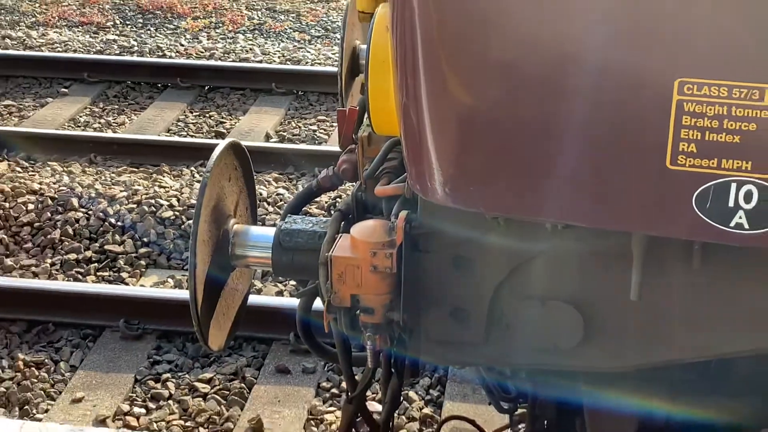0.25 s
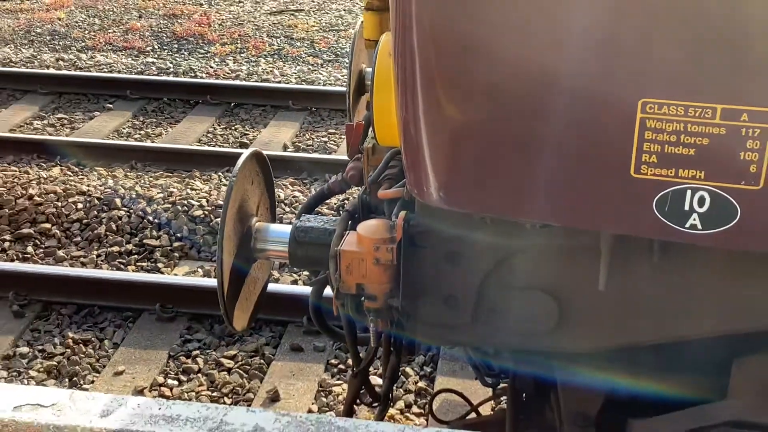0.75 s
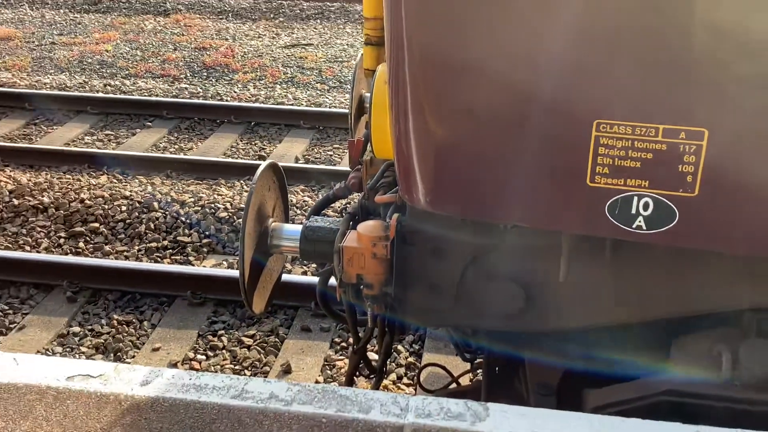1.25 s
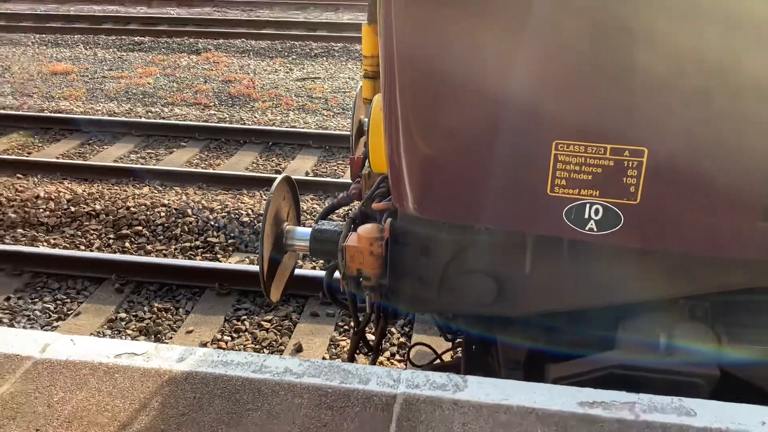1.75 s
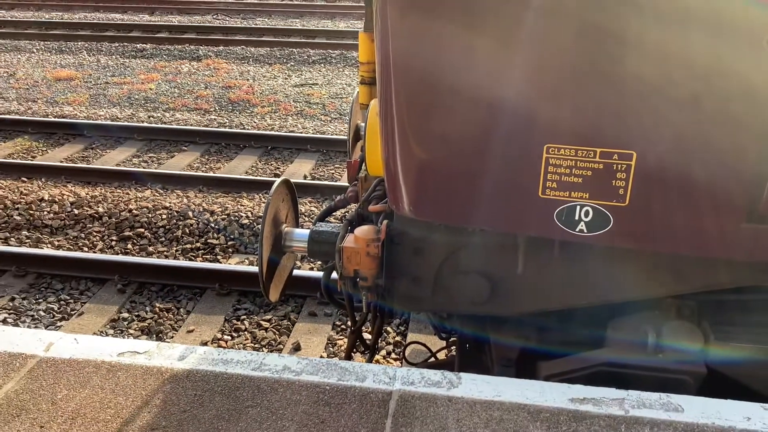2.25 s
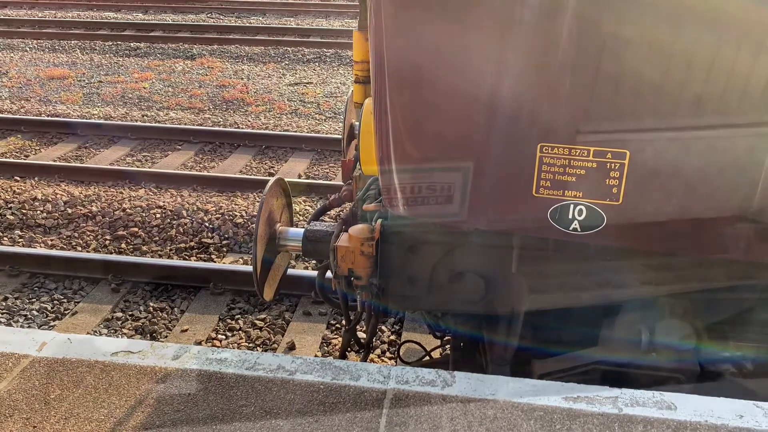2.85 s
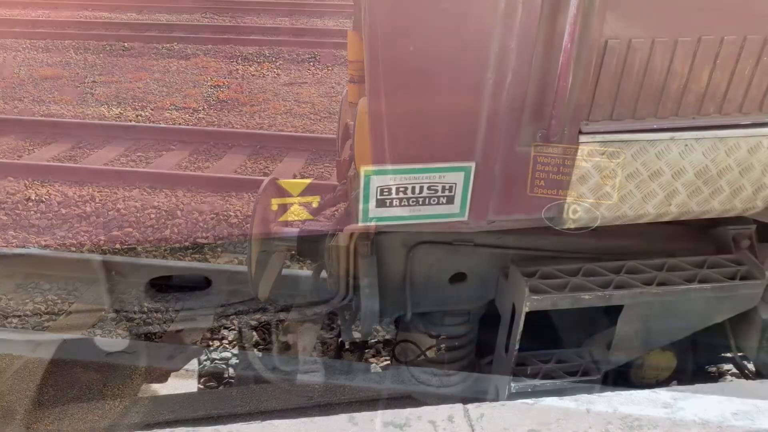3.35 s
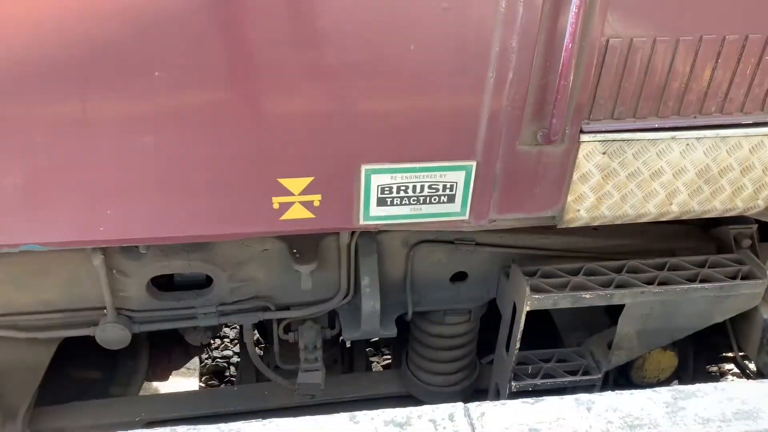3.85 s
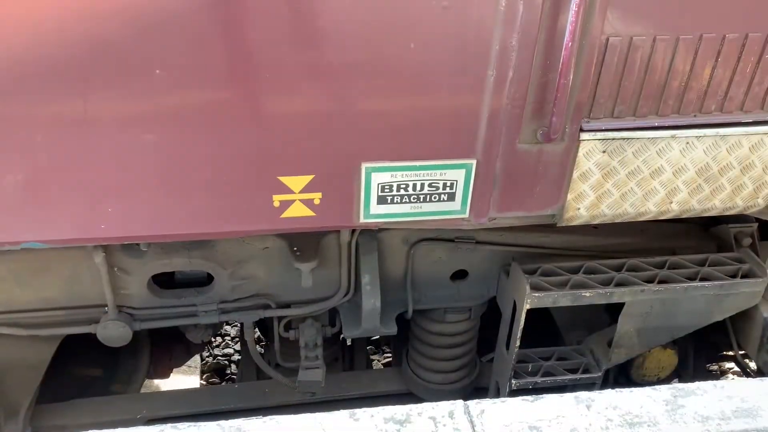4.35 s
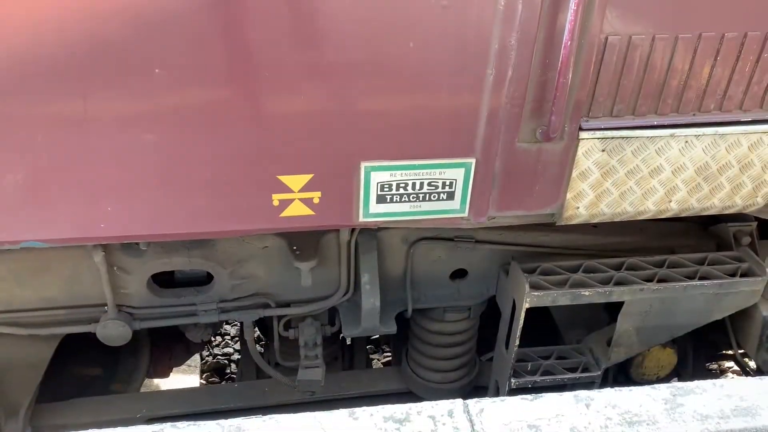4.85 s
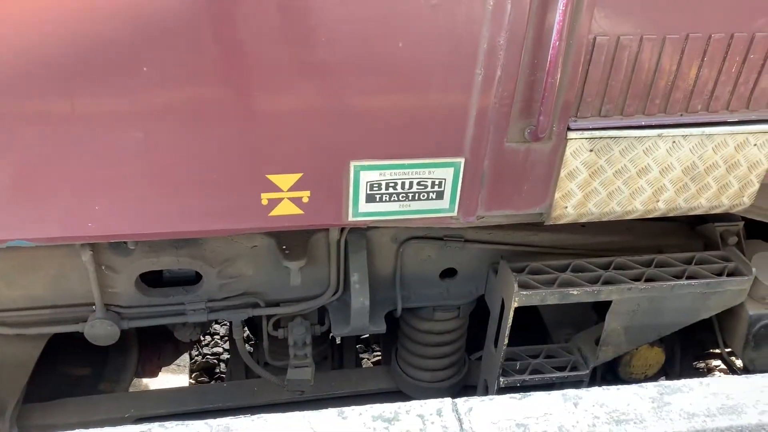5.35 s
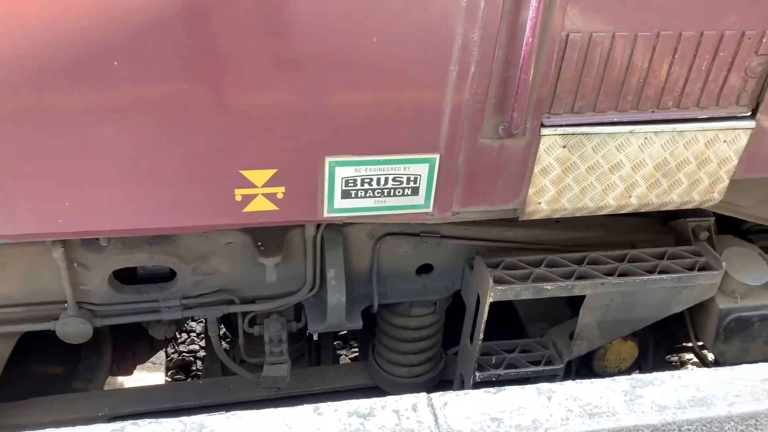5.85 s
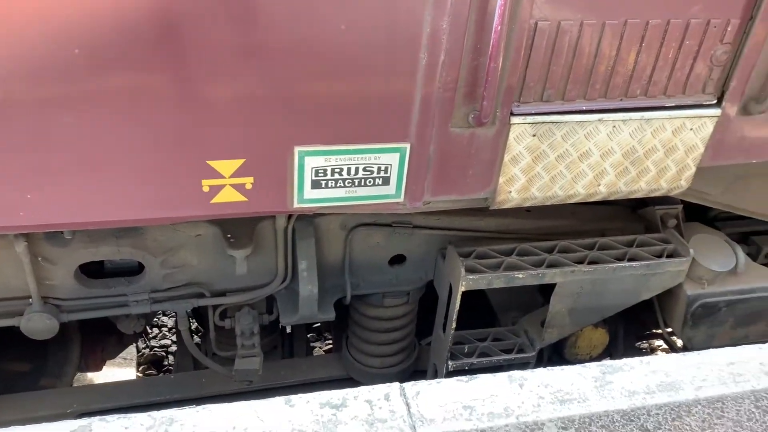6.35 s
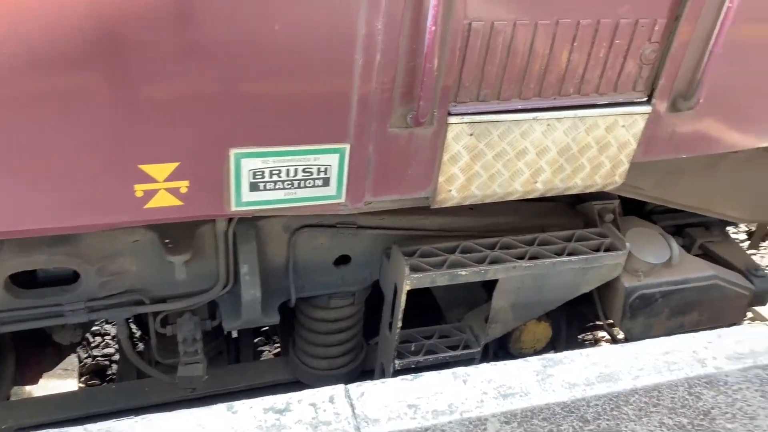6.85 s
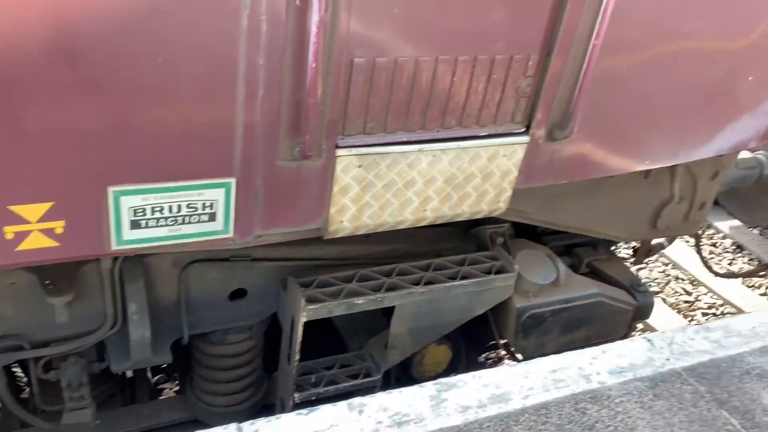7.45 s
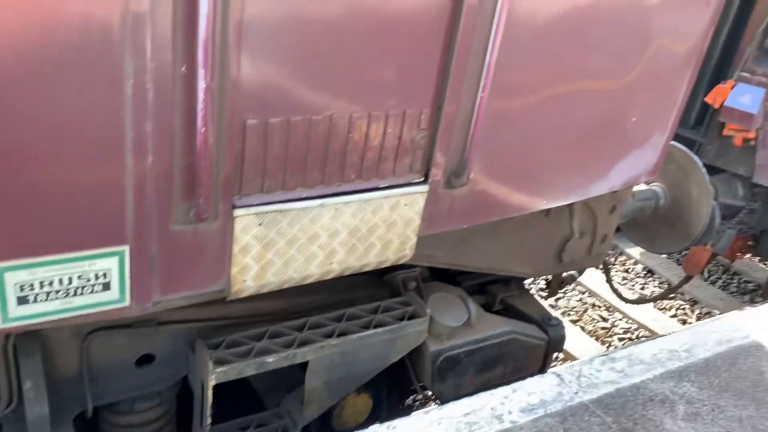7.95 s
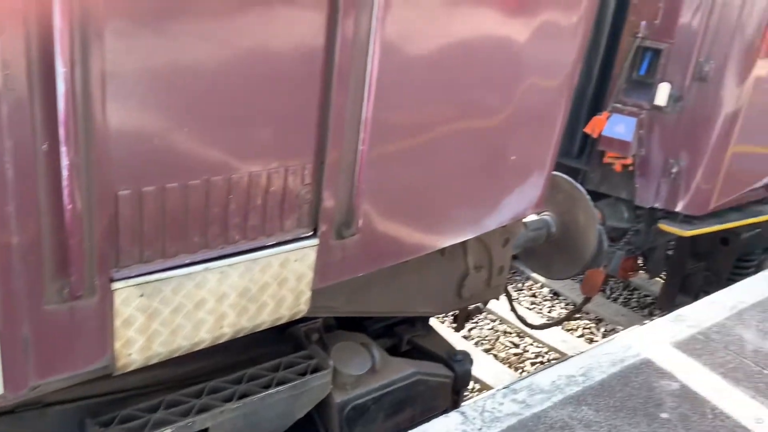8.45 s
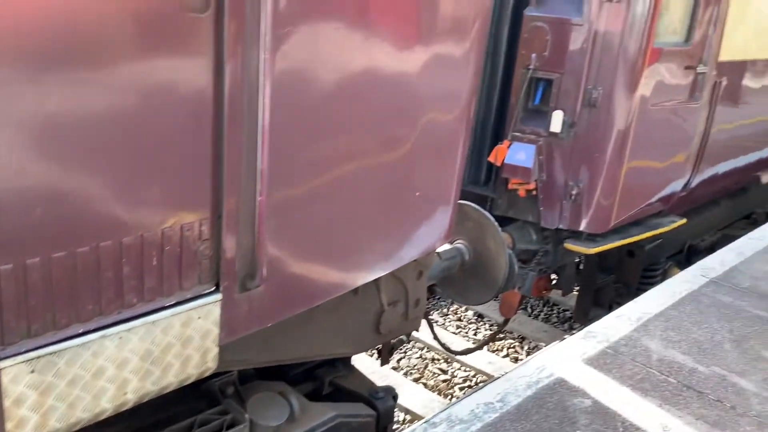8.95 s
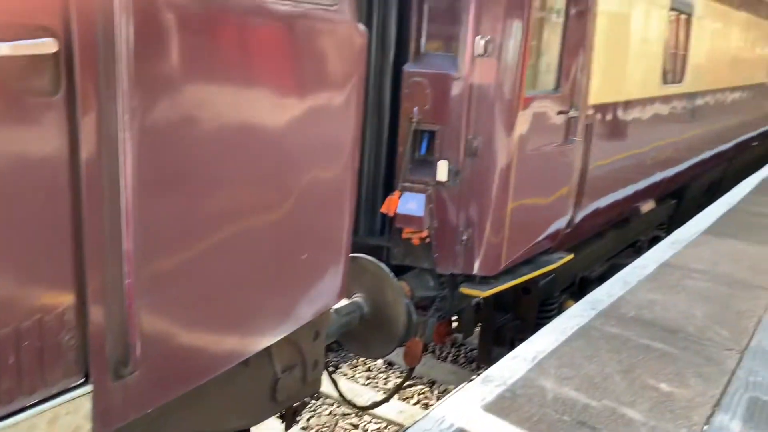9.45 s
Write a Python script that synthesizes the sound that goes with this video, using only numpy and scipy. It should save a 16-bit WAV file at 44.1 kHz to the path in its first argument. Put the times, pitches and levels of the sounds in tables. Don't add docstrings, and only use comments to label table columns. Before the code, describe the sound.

A heavy diesel locomotive idles close by with a deep throbbing drone and whine, then a quieter spot where an air valve ticks steadily.

```python
import sys
import numpy as np
from scipy import signal
from scipy.fft import rfft, irfft, next_fast_len
from scipy.io import wavfile
from scipy.ndimage import uniform_filter1d, map_coordinates

SR = 44100
rng = np.random.default_rng(int(sys.argv[2]) if len(sys.argv) > 2 else 0)


def log_audio(samples):
    frames = np.atleast_2d(samples).T
    limited = np.clip(frames, -1, 1)
    pcm = np.round(limited * 32767).astype(np.int16)
    wavfile.write(sys.argv[1], SR, pcm)


def ratio_of_db(decibels):
    return 10 ** (np.asarray(decibels, float) / 20)


N = 427329

CRANK_HZ, MESH_HZ = 6.815, 269.1
FADE_S = (2.67, 3.635)
NEAR_WALK_S, FAR_WALK_S = (0, 2.41), (7.98, 9.6)
GAP_HZ = (11250, 12250)


def unit(x):
    return x / np.sqrt(np.mean(x ** 2) + 1e-20)


def along(points, hz):
    f, *cols = np.transpose(points)
    return [np.interp(np.log(hz + 1), np.log(f + 1), c) for c in cols]


def curves(rows):
    s, *cols = np.transpose(rows)
    return [np.interp(np.arange(N) / SR, s, c) for c in cols]


def ramp(span_s):
    return np.interp(np.arange(N) / SR, span_s, [0, 1])


def wobble(rate):
    knots = rng.standard_normal(int(N * rate / SR) + 4)
    return map_coordinates(knots, [np.arange(N) * rate / SR])


# (frequency [Hz], likeness [0-1], right leads [rad], left against right [dB])
NEAR_PAIR = [(60, .99, .25, -1.3), (110, .99, .4, -.9), (160, .98, .6, -.2), (350, .95, 1.1, .4),
             (570, .8, 2.3, 0), (900, .68, 2.8, -4.7), (1100, .55, 2.3, -5.8), (1500, .65, 2.4, -1.5),
             (2200, .4, 2.2, -1.4), (4500, .2, 2.5, -3.3), (7000, .5, 1, -.5), (10000, .85, 0, 0)]
FAR_PAIR = [(55, .99, .05, -2.5), (62, .99, -.15, -1.4), (70, .99, -.1, -1.8), (160, .98, .1, -.1),
            (350, .92, -.2, -.3), (570, .72, -.6, -1.2), (900, .76, -1.5, -.3), (1500, .48, -2.9, -1.6),
            (2200, .1, -3, -1.1), (4500, .25, -2, -3), (7000, .5, -1.5, -.5), (10000, .85, 0, 0)]


def ears(pair, hz):
    alike, lead, pan_db = along(pair, hz)
    alike = np.clip(alike, 0, 1)
    side = np.array([[-.5], [.5]])
    gains = np.exp(1j * lead * side) * ratio_of_db(-pan_db * side)
    return alike, gains / np.sqrt((1 + alike * np.cos(lead)) / 2)


def burst(spectrum, t, skew):
    hz = np.fft.rfftfreq(len(t), 1 / SR)
    kept = np.where((hz > GAP_HZ[0]) & (hz < GAP_HZ[1]), .03, 1)
    colour = kept * ratio_of_db(along(spectrum, hz)[0]) * np.exp(1j * skew * np.array([[.5], [-.5]]))
    return unit(irfft(rfft(rng.standard_normal(len(t))) * colour, len(t)))


def puff(t, spectrum):
    shape = np.exp(-((t - .0025) / 0.0018) ** 2)
    shape += 0.22 * np.exp(-((t - .01) / 0.0033) ** 2)
    shape += 0.33 * (1 - np.exp(-t / 0.0022)) * ratio_of_db(-60 * t / 0.22)
    return burst(spectrum, t, skew=1.6) * shape


TURN_S = 6.8

# (frequency [Hz], level [dB per Hz])
SNAP = [(600, -38), (1000, -9), (1400, 9), (1700, -13), (2600, 0), (3100, -3.5), (4200, -7), (5000, -24),
        (8000, -56)]
# (frequency [Hz], level [dB per Hz])
CRACK = [(1800, -28), (2600, 6), (3800, 0.5), (4700, -3.5), (6000, -29), (9000, -49)]
# (time [s], left lags [ms])
TICK_LAG = [
    (6.6, -.072),
    (7, -.18),
    (7.8, -.3),
    (8.6, -.31),
    (9.3, -.23),
]


def whistle(t, s, hz, octave_db):
    lag_ms = np.interp(s, *np.transpose(TICK_LAG))
    u = t - .001 - lag_ms / 1000 * np.array([[.5], [-.5]])
    gate = np.sin(np.pi * np.clip((u + 0.0014) / 0.0079, 0, 1)) ** 0.76
    flutter = np.sin(2 * np.pi * rng.uniform(120, 220) * u + rng.uniform(0, 6))
    angle = 2 * np.pi * hz * u + rng.uniform(0, 6) + .55 * flutter
    chirp = np.sin(angle) + ratio_of_db(octave_db) * np.sin(2 * np.pi * 1.968 * hz * u)
    chirp += ratio_of_db(-10.5) * burst(SNAP, t, skew=12 * lag_ms)
    if s > TURN_S:
        crack = burst(CRACK, t, skew=24 * lag_ms) * np.exp(-((u - .0004) / 0.0014) ** 2)
        chirp += ratio_of_db(octave_db + 5) * crack
    return gate * chirp


# (delay [s], left level [dB], right level [dB])
WALLS = [
    (.0078, -12, -6),
    (.0175, -17, -16),
    (.026, -21, -20),
]


def surroundings(t, s):
    turned = s > TURN_S
    yard = rng.standard_normal((2, len(t))) * ratio_of_db(-33 - 2.3 * turned - 60 * t / 0.23) * (t > .006)
    yard[:, 0] = 1
    for delay, *wall_db in WALLS:
        place = round(delay * SR + rng.uniform(0, 15))
        yard[:, place] += ratio_of_db(np.array(wall_db) - 9 * turned + rng.normal(0, 2, 2))
    return yard


# (time [s], whistle pitch [Hz], level [dB], hiss level [dB])
TICKS = [(3.246, 1970, -34, -21), (3.625, 1975, -32.5, -17), (4.0035, 2015, -32.5, -16.5),
         (4.3478, 2000, -31.5, -18.5), (4.7339, 1966, -30.5, -14), (5.1297, 1990, -30.5, -20.5),
         (5.494, 1970, -32, -17), (5.875, 2010, -31, -16.5), (6.2428, 2000, -32.5, -13.5),
         (6.6053, 1980, -31.5, -12.5), (7.0065, 2030, -29.5, -17), (7.3857, 2003, -24.5, -26),
         (7.7884, 1990, -29, -21), (8.1722, 2045, -26.5, -24.5), (8.5416, 2070, -30.5, -14),
         (8.927, 2050, -26.5, -20.5), (9.2992, 1984, -23, -27)]
# (time [s], peak level [dB])
SPITS = [
    (2.169, -50),
    (3.5473, -57),
    (4.6856, -49.5),
    (5.2979, -64),
    (5.8274, -55),
    (6.892, -55),
]
# (frequency [Hz], level [dB per Hz])
AIR = [(3060, -37), (5200, -15), (5730, -14), (6220, -5.5), (9780, 1.5), (11500, -16), (11900, -1.5),
       (13800, -2), (15700, -3)]
AIR_TURNED = [(3060, -41), (5200, -17), (6950, -7.5), (7560, -4), (8760, 3.5), (10300, -3), (11800, -13.5),
              (13600, 1), (15700, -17.5)]


def valve():
    out, t = np.zeros((2, N + SR)), np.arange(8192) / SR
    for s, hz, db, hiss_db in TICKS:
        chirp = whistle(t, s, hz, octave_db=hiss_db + 2)
        tick = ratio_of_db(2.5) * signal.fftconvolve(chirp, surroundings(t, s), axes=1)[:, :len(t)]
        air = AIR
        if s >= TURN_S:
            air = [(f, d + 4 * (s - 8) * (f > GAP_HZ[1])) for f, d in AIR_TURNED]
        tick += ratio_of_db(hiss_db + 3.0) * puff(t - 0.00067 * (t > .001), air)
        out[:, round((s - .001) * SR):][:, :len(t)] += ratio_of_db(db) * tick
    for s, db in SPITS:
        out[:, round((s - .002) * SR):][:, :len(t)] += ratio_of_db(db - 3.5) * puff(t / 2.0, AIR)
    return out[:, :N]


LOUD_HZ = (1615.6, 2691, 3554.5)
# (first place [dB], gain over the walk [dB], second place [dB])
LOUD_DB = [
    (-57.5, 3, -63),
    (-60.5, 6, -71.5),
    (-68.5, 10, -72.5),
]
# (time [s], peak level [dB], half length [s])
SWELLS = [
    [(.95, -61, .45), (7.9, -59, 0.23), (7.6, -69, 0.27), (4.5, -70, 0.6), (9.5, -66, .15)],
    [(4.6, -66.5, 1), (7.15, -68, 0.44), (8.7, -68, .2), (9.4, -68, .15)],
    [(.8, -62.5, 0.83), (2.7, -62.5, .25), (5.7, -68, .2), (6.55, -71, 0.23), (7.45, -59.5, .13),
     (8.13, -63, 0.047), (8.5, -61, .12), (8.8, -65, 0.19), (9.13, -54.5, 0.16), (9.57, -60, .12)],
]


def loud_tones(side_db):
    t, out, fade = np.arange(N) / SR, np.zeros((2, N)), ramp(FADE_S)
    for hz, (near_db, gain_db, far_db), swells in zip(LOUD_HZ, LOUD_DB, SWELLS):
        level = (1 - fade) * ratio_of_db(near_db + gain_db * ramp(NEAR_WALK_S)) + fade * ratio_of_db(far_db)
        level = level + sum(ratio_of_db(db) * np.exp(-((t - s) / half) ** 2) for s, db, half in swells)
        angle = 2 * np.pi * hz * t + 0.49 * wobble(4)
        mid = level * ratio_of_db(1.2 * wobble(9)) * np.sin(angle)
        side_level = uniform_filter1d(level, SR) * ratio_of_db(side_db + 3 * wobble(1.5))
        side = side_level * np.sin(angle + 2.1 * wobble(1))
        out += np.sqrt(2) * np.array([mid + side, mid - side])
    return out


# (multiple of the mesh [-], left level [dB], right level [dB])
NEAR_WHINE = [(2, -53, -57), (3, -57, -54), (4, -62, -55), (9, -70, -70), (15, -61.5, -60), (20, -73, -73),
              (26.42, -79, -79)]
FAR_WHINE = [(2, -58, -57), (3, -62, -58), (4, -66, -65), (9, -72, -72), (12.92, -73, -73), (15, -74, -75),
             (25, -84, -84), (26.42, -80, -80)]


def whine(lines, waver_db):
    t = np.arange(N) / SR
    out = np.zeros((2, N))
    for k, *db in lines:
        angle = 2 * np.pi * k * MESH_HZ * t + .05 * k * wobble(3.7)
        for ear in range(2):
            level = ratio_of_db(db[ear] + waver_db * wobble(2.354))
            out[ear] += np.sqrt(2) * level * np.sin(angle + 2.07 * wobble(1.498))
    return out


def rush(spectrum, pair, patchy_db):
    size = next_fast_len(N)
    z = signal.stft(rng.standard_normal((2, N + 512)), nperseg=512)[2]
    field = uniform_filter1d(rng.standard_normal(z.shape[1:]), size=6, axis=0)
    field = uniform_filter1d(field, size=14, axis=1)
    noise = signal.istft(z * ratio_of_db(patchy_db * unit(field)), nperseg=512)[1][:, :N]
    a, b = rfft(noise, size)
    hz = np.fft.rfftfreq(size, 1 / SR)
    alike, gains = ears(pair, hz)
    gains *= hz < 15350
    gains *= (hz < GAP_HZ[0]) | (hz > GAP_HZ[1])
    turn = np.arccos(alike) / 2
    both = np.array([np.cos(turn) * a + np.sin(turn) * b, np.cos(turn) * a - np.sin(turn) * b])
    out = irfft(both * gains * ratio_of_db(along(spectrum, hz)[0]), size)[:, :N]
    return out / np.std(out.mean(0))


# (frequency [Hz], level [dB per Hz])
NEAR_BODY = [(52, -26.5), (86, -23), (99, -5.5), (112, -20), (140, -18.5), (333, -21.5), (398, -23.5),
             (528, -27.5), (774, -33), (927, -45.5), (1040, -36), (1300, -49.5), (1690, -73.5),
             (2860, -120)]
NEAR_RATTLE = [(560, -36.5), (950, -6), (1640, -4), (2470, -11), (2770, -14), (3220, -17), (3660, -14),
               (7440, -28.5), (9610, -29), (10900, -35), (11600, -65), (13000, -34), (15300, -48.5)]
FAR_BODY = [(47, -27.5), (80, -7), (114, -11.5), (167, -7.5), (206, -14), (324, -16), (373, -22.5),
            (455, -28), (548, -16.5), (769, -18.5), (895, -38), (1300, -36), (1690, -78), (2860, -120)]
FAR_RATTLE = [(560, -26.5), (950, 1.5), (1460, -5), (1600, -3.5), (2140, -3), (2970, -15), (3580, -12.5),
              (7530, -30), (9280, -27.5), (10900, -35.5), (11600, -64), (13000, -34), (15300, -43)]


def roar(body, rattle, body_db, rattle_db, beat, pair):
    low = ratio_of_db(body_db + beat + 0.75 * wobble(4.7)) * rush(body, pair, patchy_db=-1.23)
    high = ratio_of_db(rattle_db + beat + 0.27 * wobble(5.9)) * rush(rattle, pair, patchy_db=1.44)
    return low + high


def panels(crank, orders, pair, level_db, comb_db):
    out, turn = np.zeros((2, N)), np.zeros(2049, complex)
    order = np.arange(2049)
    k = np.arange(12, 140)
    turn[k] = ratio_of_db(comb_db - 0.13 * k + rng.normal(0, 2.33, len(k)))
    for k, db in orders:
        if k > 11:
            turn[round(k)] = ratio_of_db(db)
    turn = turn * np.exp(2j * np.pi * rng.random(2049)) * ears(pair, order * CRANK_HZ)[1]
    for p in range(5):
        cycle = irfft(turn * (order // 4 % 5 == p)) * 2048 * np.sqrt(2)
        late_s = .00018 * wobble(1.5) + .00012 * np.array([wobble(1.5), wobble(1.5)])
        place = (crank / (2 * np.pi) - CRANK_HZ * late_s) % 1 * 4096
        heard = [np.interp(u, np.arange(4096), c, period=4096) for u, c in zip(place, cycle)]
        out += ratio_of_db(level_db + 1.3 * wobble(2.5)) * heard
    return out


# (multiple of the crank [-], level [dB])
NEAR_ORDERS = [(7, -25.3), (8, -13.5), (9, 0.0), (10, -17.6), (11, -28.5), (12, -28.6), (14, -25.0),
               (15, -28.1), (16, -25.8), (24, -24), (27, -31.5), (33, -33.9), (47, -34.9), (54, -36.7),
               (55, -33.3), (56, -31.8), (58, -34.0), (59, -32.8), (61, -34.1), (63, -32.1), (64, -39.6),
               (66, -38.3), (70, -36.6), (73, -39.5), (79, -43.3), (84, -41.0), (87, -39.7), (89, -43.3),
               (113, -41.5)]
FAR_ORDERS = [(6, -23.7), (8, -4.5), (9, 0.0), (10, -10.3), (11, -14.0), (16, -15.9), (17, -20.2),
              (18, -22.4), (24, -13.0), (33, -21.8), (36, -21.1), (42, -24.1), (48, -24.4), (54, -20.6),
              (55, -25.7), (63, -25.1), (64, -27.5), (69, -26.8), (70, -27.1), (71, -25.4), (72, -20),
              (77, -27.7), (78, -23.0), (79, -21.6), (84, -26.7), (85, -25.9), (87, -28.1), (88, -24.9),
              (95, -27), (112, -26.5)]


def exhaust(crank, throb, orders, pair, stack, level_db, eighth_db, unsteady_db):
    out = np.zeros((2, N))
    for k, db in orders:
        if k > 11:
            continue
        step = k - 9
        angle = k * crank + stack.get(k, -throb)
        order_db = eighth_db if step == -1 else db
        level = ratio_of_db(level_db + order_db + unsteady_db * abs(step) * wobble(2.1))
        out += np.sqrt(2) * level * np.real(ears(pair, k * CRANK_HZ)[1] * np.exp(1j * angle))
    return out


# (time [s], crank ahead of an even pace [ms], throb angle [rad])
NEAR_PATH = [
    (0, 6.05, -3.23),
    (3.6, 8.4, -3.19),
]
FAR_PATH = [
    (2.7, -4.3, .68),
    (4, -3.35, .6),
    (5.8, -.85, .6),
    (6.6, -.5, .58),
    (7.5, -1.1, .43),
    (8.1, -2.05, .2),
    (9.69, -4.85, -.1),
]


def engine(path, walk_s, note, orders, noise, body, rattle, lines, pair, stack,
           comb_db, orders_db, whine_db, beat_db, unsteady_db):
    closer = ramp(walk_s)
    ninth_db, ninth_gain_db, eighth_db = note
    body_db, rattle_db = noise[0] + noise[1] * closer, noise[2] + noise[3] * closer
    ahead_ms, throb = curves(path)
    crank = 2 * np.pi * CRANK_HZ * (np.arange(N) / SR + ahead_ms / 1000)
    beat = beat_db * np.cos(crank + 1)
    out = ratio_of_db(rattle_db + whine_db) * whine(lines, waver_db=-1.5)
    out += roar(body, rattle, body_db, rattle_db, beat, pair)
    out += panels(crank, orders, pair, body_db + orders_db, comb_db)
    level_db = ninth_db + ninth_gain_db * closer
    return out + exhaust(crank, throb, orders, pair, stack, level_db, eighth_db, unsteady_db)


def scene():
    fade = ramp(FADE_S)
    near = engine(NEAR_PATH, NEAR_WALK_S, note=(-16.8, 3.45, -13.5), orders=NEAR_ORDERS,
                  noise=(-36.5, 5.5, -49, 6), body=NEAR_BODY, rattle=NEAR_RATTLE, lines=NEAR_WHINE,
                  pair=NEAR_PAIR, stack={7: 1.0, 9: 0, 10: -1.1, 11: 1.6},
                  comb_db=-37.0, orders_db=18, whine_db=44.5, beat_db=-0.05, unsteady_db=-1.0)
    far = engine(FAR_PATH, FAR_WALK_S, note=(-32.3, 5.7, -4.45), orders=FAR_ORDERS,
                 noise=(-41.5, 4.5, -51, 4), body=FAR_BODY, rattle=FAR_RATTLE, lines=FAR_WHINE,
                 pair=FAR_PAIR, stack={6: 1.2, 9: 0, 10: -.3, 11: 3.8},
                 comb_db=-23.5, orders_db=10.2, whine_db=52, beat_db=0.26, unsteady_db=0.0)
    return (1 - fade) * near + fade * far + loud_tones(side_db=-1.5) + valve()


def band_limit(x):
    return signal.sosfilt(signal.butter(12, 15810, fs=SR, output="sos"), x)


def record(dry):
    size = next_fast_len(N)
    kept = np.fft.rfftfreq(size, 1 / SR) < 15750
    mix = irfft(rfft(dry, size) * kept, size)[:, :N]
    return band_limit(mix)


dry = scene()
out = record(dry)
log_audio(out)
```